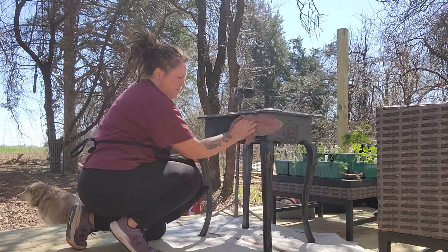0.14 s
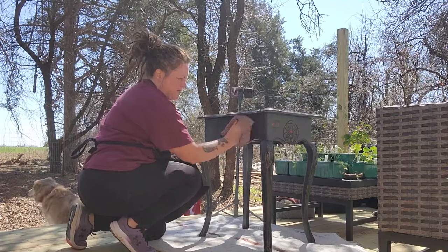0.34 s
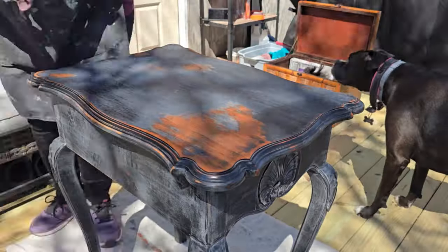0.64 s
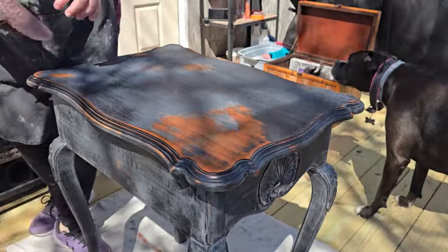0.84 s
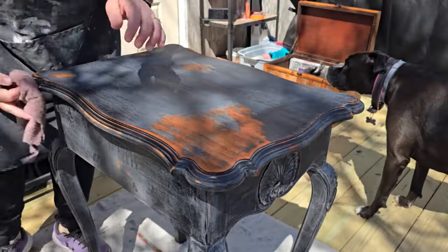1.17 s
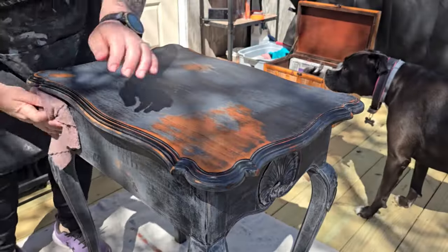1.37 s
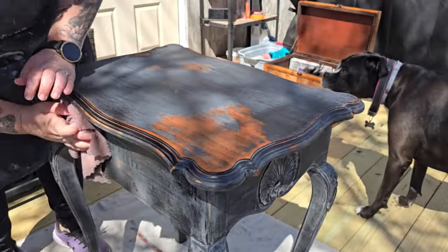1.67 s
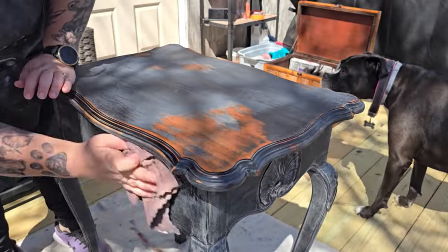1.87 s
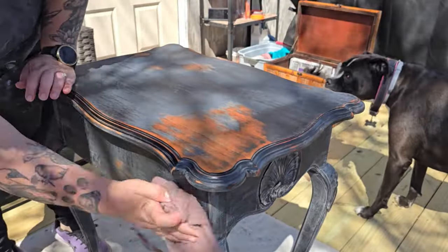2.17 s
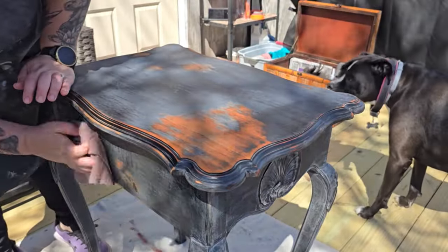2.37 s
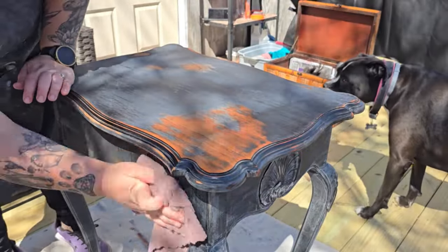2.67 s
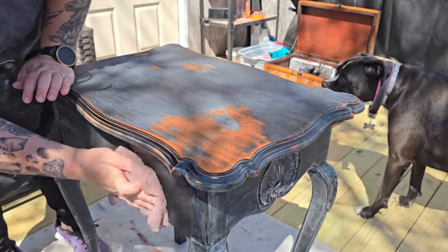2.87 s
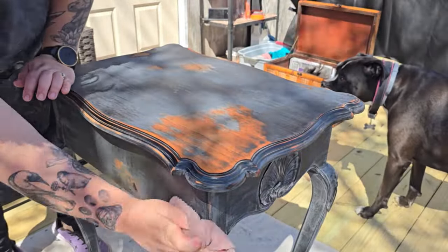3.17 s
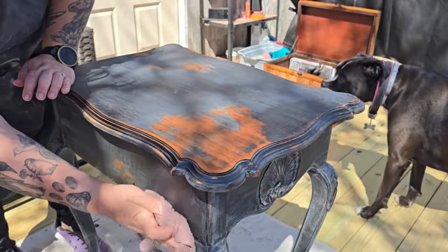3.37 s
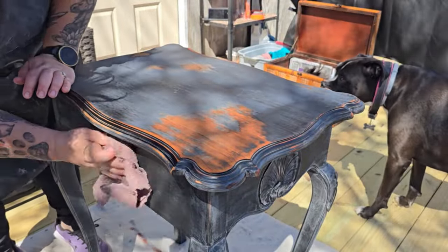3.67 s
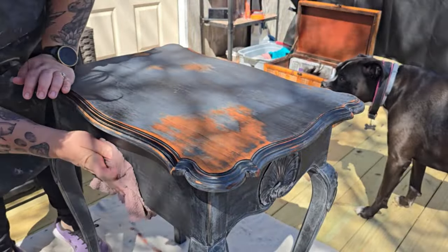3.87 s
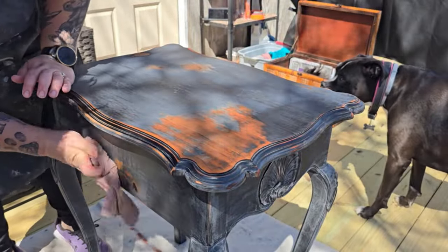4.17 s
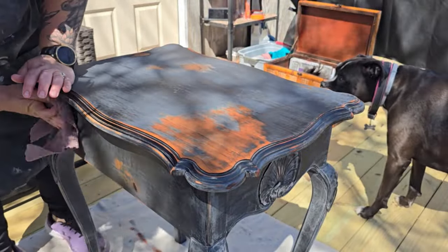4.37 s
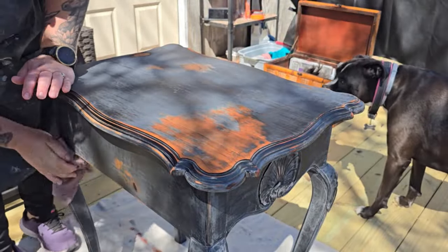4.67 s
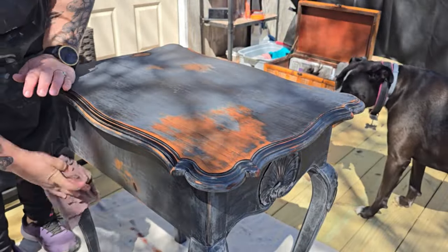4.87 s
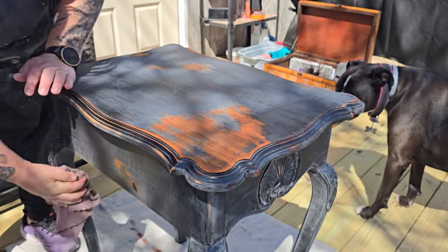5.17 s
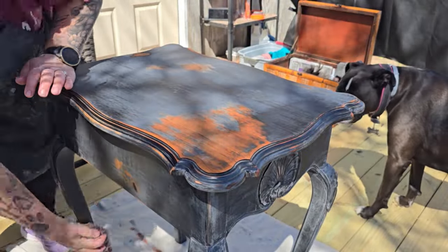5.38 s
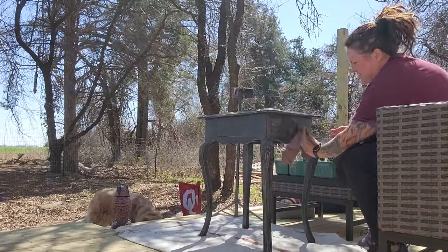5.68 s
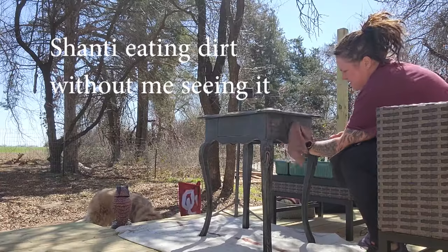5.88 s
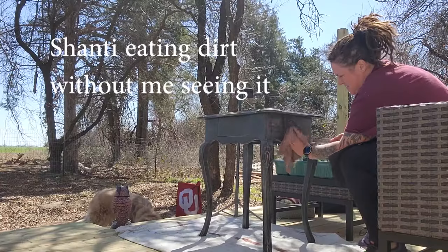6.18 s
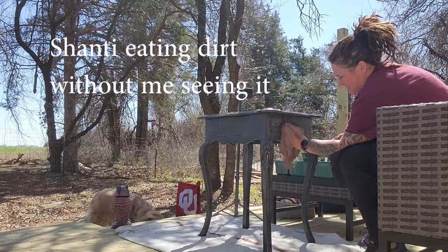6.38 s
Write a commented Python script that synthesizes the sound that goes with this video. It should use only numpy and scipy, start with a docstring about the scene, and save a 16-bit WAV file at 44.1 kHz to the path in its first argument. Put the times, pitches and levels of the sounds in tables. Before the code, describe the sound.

Knuckle taps on hollow wood, then a soft cloth rubbing in faint uneven strokes while wind buffets the microphone on a porch.

```python
"""A damp cloth wipes a small wooden table on a porch, heard by a phone from three places in turn.
A breeze made of random pulses and a murmur of filtered noise run throughout. Knuckles first tap the
wood, ringing its modes; from 0.7 s the cloth hisses stroke by stroke in tiny clicks, with a few more taps.
From 1 s to 5 s hard buffets of wind strike the two microphone ports, worst around 2.5 s.
Faint gliding tones whistle now and then from 1.1 s, most often near the end."""
import sys
import numpy as np
from scipy import signal
from scipy.fft import rfft, irfft, next_fast_len
from scipy.io import wavfile
from scipy.ndimage import uniform_filter1d

SR = 44100
rng = np.random.default_rng(int(sys.argv[2]) if len(sys.argv) > 2 else 0)


def waveform_to_disk(signal):
    """Save audio, clipped to [-1, 1], as 16-bit WAV at the path in sys.argv[1]."""
    frames = np.transpose(np.atleast_2d(signal))
    scaled = np.clip(frames, -1, 1) * 32767
    samples = np.round(scaled).astype(np.int16)
    wavfile.write(sys.argv[1], SR, samples)


N = 287532
T = np.arange(N) / SR
EARS = np.array([[1], [-1]])  # left, right


def undb(db):
    """Turn decibels into a plain gain."""
    return 10 ** (np.asarray(db) / 20)


def unit(x):
    """Scale a sound to rms 1."""
    return x / np.sqrt(np.mean(x ** 2))


def colour(x, spectrum):
    """Filter to the given (f/Hz, level/dB) shape without sounding early (via the cepstrum); rms 1."""
    hz, db = np.transpose(spectrum)
    size = next_fast_len(N + SR // 4)
    f = np.maximum(np.fft.rfftfreq(8192, 1 / SR), 1)
    ceps = irfft(np.interp(np.log(f), np.log(hz), db) * np.log(10) / 20)
    # folding the second half onto the first makes the filter causal
    ceps[1:4096] *= 2
    ceps[4097:] = 0
    response = irfft(np.exp(rfft(ceps)))
    return unit(irfft(rfft(x, size) * rfft(response, size), size)[..., :N])


def walk(rate):
    """Random levels held 1 / rate s and smoothed twice; spread near 1."""
    k = int(SR / rate)
    steps = np.repeat(rng.standard_normal(N // k + 1), k)
    return 1.3 * uniform_filter1d(uniform_filter1d(steps, k), k)[:N]


def grains(rate, scatter_db):
    """Random clicks of either sign and varying size, unrelated in the two ears."""
    on = rng.random((2, N)) < rate / SR
    return on * rng.standard_normal((2, N)) * undb(scatter_db * rng.exponential(size=(2, N)))


def columns(table):
    """Join each column's points by straight lines over time."""
    s, *cols = np.transpose(table)
    return [np.interp(T, s, c) for c in cols]


def apart(db, pan_db):
    """Gains of two unrelated ears whose mean has the level db."""
    return 2 * undb(db + EARS * pan_db / 2) / np.sqrt(undb(pan_db) + undb(-pan_db))


def swells(rows, attack_s, release_s, sag_db):
    """Level in dB of each event: quick rise, climb to its strongest, sag, release; short edges if short."""
    faint_db, silent_db = -25, -80
    levels_db = [silent_db, faint_db, -sag_db, 0, -sag_db, faint_db, silent_db]
    out = []
    for s, n, top, *_ in rows:
        rise, fall = min(attack_s, 0.71 * n), min(release_s, 1.8 * n)
        peak_s, end_s = s + n * np.clip(top, .02, .98), s + n
        times = [s - 2 * rise, s - rise, s, peak_s, end_s, end_s + fall, end_s + 2 * fall]
        out.append(np.interp(T, times, levels_db))
    return out


def blend(shapes_db, db, pan_db):
    """Ear gains of overlapping events, added as power."""
    return np.sqrt(sum(apart(e + d, p) ** 2 for e, d, p in zip(shapes_db, db, pan_db)))


# tone of the wind's low rumble and higher flutter: f/Hz, relative level/dB
RUMBLE_TONE = [(8.8, -48.5), (15, -15), (38, 6.5), (54, 6.5), (87, 1), (119, -10.5), (160, -33.5),
               (210, -54.5), (350, -120)]
FLUTTER_TONE = [(60, -41), (110, 5), (140, 0.5), (200, -6.5), (300, -24), (500, -39.5), (900, -55),
                (2000, -85.5)]
# breeze between gusts: t/s, rumble level/dB, flutter above rumble/dB, left minus right/dB
BREEZE_LEVELS = [(0, -66, -17, -5.5), (.65, -70.5, -16, 2.5), (1.3, -59, -24, 10), (1.5, -74, -50, 8),
                 (1.8, -70, -8, -12), (2.04, -64, -26, -2), (2.25, -62, -9.5, 13), (2.6, -62, -19, 5),
                 (2.84, -53.5, -3.5, 24), (3.06, -63, -20, 2), (3.25, -58.5, -3.5, -14),
                 (3.6, -53.5, -18, 13), (4.1, -61.5, -30, 8.5), (4.7, -58, -20, 21), (5.1, -57, -15.5, -7),
                 (5.45, -63.5, -38, 14), (5.8, -57.5, 1.5, 9), (6.1, -66.5, -7.5, -3), (6.52, -62, 1, -4)]
# gusts: start t/s, length/s, strongest at share of length, rumble level/dB, flutter above rumble/dB,
# left minus right/dB
GUST_EVENTS = [(0.265, 0.077, 0.49, -58, -23, -2), (0.708, 0.077, 0.83, -47, -15, -3),
               (0.797, 0.18, 0.15, -61.5, 3, -2), (0.966, 0.12, 0.092, -39, -4.5, 14),
               (1.109, 0.12, 0.19, -43, -15, 2.5), (1.294, 0.17, 0.46, -55.5, -7, 14),
               (1.604, 0.073, 0.17, -57, -30, 25), (1.866, 0.046, 0.44, -52.5, -2, -29),
               (1.939, 0.053, 0.49, -50.5, -45, 23), (2.109, 0.09, 0.8, -51.5, -14, 29),
               (2.332, 0.11, 0.25, -34.5, -2, 12), (2.44, 0.091, 0.16, -25, -4.5, 16),
               (2.565, 0.14, 0.1, -38, -12, 9.5), (2.702, 0.06, 0.32, -37, 4, 22),
               (2.875, 0.086, 0.7, -37, -32, 22), (2.932, 0.099, 0.35, -38, -13, -4),
               (3.094, 0.11, 0.2, -35.5, -16, 13), (3.262, 0.06, 0.61, -35.5, -0.5, 2.5),
               (3.355, 0.095, 0.94, -39.5, -27, 0), (3.477, 0.13, 0.065, -41.5, -11.5, 12),
               (3.616, 0.14, 0.8, -42, -8, 0.5), (3.771, 0.094, 0.43, -37, 0, 11),
               (3.86, 0.059, 0.58, -37.5, -20.5, -2), (3.964, 0.12, 0.13, -50.5, -9, 14),
               (4.178, 0.091, 0.88, -56.5, -3.5, 29), (4.332, 0.052, 0.5, -48, 0.5, 12),
               (4.432, 0.18, 0.17, -45, -14, 15), (4.673, 0.36, 0.21, -57, -2, 14),
               (4.889, 0.11, 0.93, -42, -15, 7.5), (5.137, 0.11, 0.31, -51, -14, -28),
               (5.46, 0.036, 0.32, -54, -29, 17), (5.583, 0.057, 0.37, -58.5, -2.5, -6),
               (5.738, 0.058, 0.54, -47.5, -7, 14), (5.901, 0.039, 0.45, -42.5, -6, 25),
               (6.131, 0.15, 0.27, -57, 3, 2), (6.312, 0.17, 0.41, -55.5, -1.5, 2)]
# hardest buffets: middle t/s, level/dB in the louder ear before the pointed crest, left minus right/dB
BUFFET_EVENTS = [(1.018, -30.5, 10), (1.165, -34.5, -20), (1.905, -39, -16), (2.351, -24, 13),
                 (2.378, -24.5, 10), (2.467, -16, 12), (2.5, -21, 20), (2.523, -20.5, 19), (2.716, -28, -1),
                 (2.741, -25.5, 13), (2.776, -23.5, 16), (2.94, -29, -12), (2.98, -39, -12),
                 (3.142, -30, 5), (3.29, -23.5, 19), (3.422, -30, 3), (3.49, -26.5, 11), (3.616, -34.5, 19),
                 (3.719, -28, -26), (3.8, -31, 2), (3.828, -31, 24), (4.121, -36.5, 15), (4.363, -43.5, 18),
                 (4.458, -36, 16), (4.532, -38.5, 11), (4.943, -29.5, 7)]


def wind():
    """Eddies push each port in soft random pulses; their flutter peaks more sharply than their rumble."""
    db, flutter_db, pan_db = np.transpose(GUST_EVENTS)[3:]
    attack_s, release_s = 0.016, 0.027
    rumble_shapes = swells(GUST_EVENTS, attack_s, release_s, 9.5)
    flutter_shapes = swells(GUST_EVENTS, attack_s, release_s, 13)
    calm_db, calm_flutter_db, calm_pan_db = columns(BREEZE_LEVELS)
    calm_rumble = apart(calm_db, calm_pan_db)
    calm_flutter = apart(calm_db + calm_flutter_db, calm_pan_db)
    rumble = np.hypot(calm_rumble, blend(rumble_shapes, db, pan_db))
    flutter = np.hypot(calm_flutter, blend(flutter_shapes, db + flutter_db, pan_db))
    eddies = grains(180, 0.77)
    gusts = rumble * colour(eddies, RUMBLE_TONE) + flutter * colour(eddies, FLUTTER_TONE)

    half = 1500  # samples either side of a buffet
    t = np.arange(-half, half) / SR
    hush = 1 - .5 * np.hanning(len(t))  # the small eddies give way around a hard buffet
    width_s = 0.0037
    # a hard buffet is one swing of pressure with a dip either side
    swing = (1 - (t / width_s) ** 2) * np.exp(-.5 * (t / width_s) ** 2)
    swing += undb(-19.5) / (1 + (t / 0.00089) ** 2)  # its crest is pointed
    for s, peak_db, lr_db in BUFFET_EVENTS:
        i = int(s * SR)
        ear_gain = undb(np.array([[min(lr_db, 0)], [min(-lr_db, 0)]]))
        push = rng.choice([-1, 1], (2, 1))  # inward or outward at each port
        gusts[:, i - half:i + half] *= hush
        gusts[:, i - half:i + half] += push * undb(peak_db) * ear_gain * swing
    return gusts


# tone of the fine hiss, its airy top and the coarse scrape: f/Hz, relative level/dB
HISS_TONE = [(3530, -9), (6000, -3.5), (6880, -3.5), (8820, -7), (10300, -5), (11000, -5.5), (14300, -36),
             (22000, -120)]
AIRY_TONE = [(6470, -36), (11000, -10), (14300, -3.5), (15100, -4.5), (15700, -12)]
SCRAPE_TONE = [(530, -20.5), (900, -11), (1080, -21.5), (1290, -2), (1670, -3.5), (2220, 1), (2720, -3),
               (3460, -1.5), (7000, -12), (9100, -22), (15400, -120)]
# brighter band sliding as the cloth folds and turns: t/s, centre f/Hz, mean level above hiss/dB
BRIGHT_BAND = [(0, 8500, -9), (1.0, 8500, -16), (1.9, 8800, -5), (2.35, 8800, -3.5), (2.55, 9500, -6.5),
               (2.9, 8800, -8), (3.2, 9400, -3), (3.33, 8700, 1), (3.43, 7600, 0), (3.52, 8600, -4),
               (3.65, 9000, -16), (3.8, 9400, -3), (3.92, 9500, -6), (4.1, 8700, -3), (4.23, 9500, -3),
               (4.55, 9000, -7), (4.9, 9000, -7), (6.52, 9000, -12)]
# strokes, and at 0.753 the brief bright crack of a tap: start t/s, length/s,
# hardest at share of length, hiss level/dB before its patchiness,
# scrape above hiss/dB, airy top above hiss/dB, left minus right/dB before the ears share sound
STROKE_EVENTS = [(0.712, 0.021, 0.3, -92, 1, 2, -7), (0.753, 0.0099, 0.46, -78.5, -3, 1, -20),
                 (0.8, 0.08, 0.7, -87.5, 3, -8, -1), (0.963, 0.17, 0.16, -84, 3, -1.5, 2),
                 (1.19, 0.26, 0.44, -89, 7, -5, 2), (1.497, 0.14, 0.27, -86, 1, -5, 3),
                 (1.67, 0.11, 0.33, -89.5, 8, -2, 0), (1.819, 0.15, 0.46, -79, -0.5, -0.5, 5.5),
                 (1.943, 0.2, 0.081, -84, 1.5, 2.5, 2.5), (2.218, 0.21, 0.68, -79.5, -2.5, 0.5, 3.5),
                 (2.482, 0.27, 0.38, -80, -2.5, -1.5, 3.5), (2.758, 0.44, 0.21, -82, -7, -2, 3.5),
                 (3.114, 0.12, 0.81, -82.5, -2.5, 2.5, 1), (3.262, 0.097, 0.68, -80, -3.5, 1.5, 3),
                 (3.415, 0.1, 0.089, -79, -18, -1, 4), (3.515, 0.068, 0.18, -82, -10.5, 2, 4),
                 (3.594, 0.061, 0.73, -87.5, 2.5, 5, 4), (3.685, 0.19, 0.64, -81, -3, 1, 5.5),
                 (3.908, 0.03, 0.15, -73, -16, -2, 6), (3.968, 0.2, 0.79, -84.5, 0.5, 3.5, 5),
                 (4.2, 0.058, 0.57, -75, -12, 0.5, 7), (4.33, 0.13, 0.94, -85, 5.5, 2.5, 5.5),
                 (4.488, 0.18, 0.59, -80, -2, 1, 7.5), (4.657, 0.17, 0.34, -85.5, 3, 3.5, 5.5),
                 (4.91, 0.052, 0.44, -90.5, -4, 3, 8), (5.02, 0.065, 1, -95.5, 15.5, -18, 8),
                 (5.135, 0.17, 0.82, -93, 5.5, -5, 4), (5.347, 0.38, 0.3, -85, 4, -16, 1),
                 (5.737, 0.11, 0.066, -90.5, 10, -18, 4), (5.872, 0.15, 0.11, -83.5, 6.5, -5, 1.5),
                 (6.09, 0.13, 0.53, -89.5, 6.5, -15, 3), (6.247, 0.16, 0.26, -93, 9, -10, 2),
                 (6.37, 0.16, 0.19, -90, 6, -6, 2)]


def cloth():
    """Fibres slip in dense tiny clicks: patchy hiss with a sliding bright band, airy top and scrape."""
    db, scrape_db, top_db, pan_db = np.transpose(STROKE_EVENTS)[3:]
    press = swells(STROKE_EVENTS, attack_s=0.1, release_s=0.059, sag_db=2)
    hiss = colour(grains(9000, 0.43), HISS_TONE) * undb(2.8 * walk(24.77))

    centre_hz, sheen_db = columns(BRIGHT_BAND)
    width_hz = 1900
    slow = signal.butter(2, width_hz / 2, fs=SR, output="sos")
    turn = 2 * np.pi * np.cumsum(centre_hz) / SR
    # slow noise on a sine and a cosine makes a noise band around the centre
    sheen = sum(signal.sosfilt(slow, rng.standard_normal((2, N))) * f(turn) for f in (np.sin, np.cos))
    sheen = unit(sheen)
    hiss = hiss + undb(sheen_db + 1.4 * walk(15)) * sheen

    top = colour(grains(12000, 0.38), AIRY_TONE) * undb(0.4 * walk(38))
    scrape = colour(grains(4000, 0.87), SCRAPE_TONE) * undb(2.2 * walk(30))
    rub = blend(press, db, pan_db) * hiss
    rub += blend(press, db + top_db, pan_db) * top
    rub += blend(press, db + scrape_db, pan_db) * scrape
    return rub + 0.13 * rub[::-1]  # a share of each ear's sound reaches the other


# ringing modes of the table: f/Hz, level/dB before each tap's changes,
# time to fade by 60 dB/s before the tap's ring factor
TABLE_MODES = [(178, 4, 0.076), (239, -7, 0.13), (302, 1, 0.069), (455, -0.5, 0.1), (556, -18, 0.059),
               (720, 2, 0.096), (794, -4, 0.091), (880, -13.5, 0.12), (919, -5.5, 0.068),
               (1048, -8.5, 0.061), (1260, -5, 0.074), (1440, -4.5, 0.026), (1564, -7, 0.064),
               (1896, -12.5, 0.092), (2060, -20, 0.037), (2295, -15.5, 0.16), (3020, -12, 0.05),
               (3300, -18, 0.15), (3680, -16, 0.11), (4650, -13, 0.075)]
# taps, and at 5.742 a light broad tick as the place changes: t/s, overall level/dB,
# left minus right/dB, contact/ms, crack level/dB relative to overall,
# ring factor on the fade time, boost of modes under 350 Hz/dB, favoured f/Hz
TAP_EVENTS = [(0.399, -39.5, -3, 0.49, -30, 0.47, -6, 1020), (0.4045, -30, 4, 0.87, -30.5, 0.63, -17, 1460),
              (.4063, -31, -2, 0.81, -44, 1.22, -5, 843), (0.4136, -32, 1.5, 0.6, -40, 0.89, 5, 455),
              (.421, -33.5, -2, 0.47, -35, 0.53, -23, 810), (.754, -56, 1, .3, -16, 0.65, 7, 850),
              (1.617, -48.5, 3, 0.73, -40, 0.3, -16, 996), (2.828, -66, 5, 1.3, -30, 0.33, 9, 405),
              (4.006, -63, 0, 1.3, -22, 1.3, 1, 690), (4.27, -64, -3, .7, -12, 0.53, -7, 720),
              (4.283, -64, 12, 0.62, -23, 0.9, 7.5, 239), (4.288, -56, -4, 0.53, -34, 0.81, -6, 1260),
              (4.293, -52, -5, 0.65, -32, 0.67, -10, 770), (4.311, -58, 2, 0.5, -35, 0.4, 4.5, 1260),
              (4.316, -59, -2, 0.83, -30, 0.52, -9, 760), (4.353, -64, 3, 0.25, -10.5, 1.2, -17, 880),
              (5.027, -68.5, -2, 0.66, -14, 1.6, -18, 560), (5.073, -59, 3, 0.37, -7.5, 0.34, 5.5, 3300),
              (5.217, -52, 4, .8, -30, 0.24, -7, 720), (5.221, -59.5, 1, 1.2, -37, 1.2, -0.5, 302),
              (5.742, -46.5, 10, .4, -22, 0.16, 2, 520)]


def taps():
    """Each blow rattles on the wood and rings its modes, duller with longer contact, under a dry crack."""
    out = np.zeros((2, N + SR // 2))
    t = np.arange(SR // 4) / SR
    hz, mode_db, t60 = (c[:, None] for c in np.transpose(TABLE_MODES))
    crack_band = signal.butter(3, [1200, 4600], "band", fs=SR, output="sos")
    for s, db, pan_db, contact_ms, crack_db, ring, thud_db, spot_hz in TAP_EVENTS:
        ring = np.clip(ring, .05, 1.5)
        # every spot stirs the modes a little differently, and each ear hears them from another side
        spot, side = rng.standard_normal((2, len(TABLE_MODES), 1))
        near_db = 11 * np.exp(-(np.log2(hz / spot_hz) / 0.22) ** 2)  # modes that move most under the knuckle
        gain = undb(mode_db + near_db + spot + thud_db * (hz < 350))
        gain = gain / (1 + (hz * contact_ms / 1500) ** 2)  # long contact dulls
        fade = (1 - np.exp(-t / 0.00095)) * np.exp(-np.log(1000) * t / (t60 * ring))
        turn = EARS[:, :, None] * side * np.minimum(hz / 600, 1.3) * 0.59
        body = np.sum(gain * fade * np.sin(2 * np.pi * hz * t + turn), axis=1)
        rattle = .018 * np.exp(-t / (.008 * ring)) * rng.standard_normal((2, len(t)))
        rattle = (t == 0) + rattle  # the first blow, then the rattle
        body = signal.fftconvolve(body, rattle, axes=1)[:, :len(t)]
        body = body / np.linalg.norm(gain[hz > 350])
        crack = signal.sosfilt(crack_band, rng.standard_normal((2, len(t))))
        crack = crack / np.std(crack)
        crack *= (1 - np.exp(-t / 0.001)) * np.exp(-t / (0.038 * ring))
        i = int(s * SR)
        out[:, i:i + len(t)] += undb(db + EARS * pan_db / 2) * (body + undb(crack_db) * crack)
    return out[:, :N]


# faint far whistles, perhaps birds: start t/s, length/s, from f/Hz, to f/Hz (both before the waver),
# level/dB before the blur
WHISTLE_EVENTS = [(1.105, 0.034, 4020, 4130, -77), (1.123, 0.07, 4220, 4270, -77),
                  (1.19, .08, 4200, 4250, -88), (1.232, 0.053, 1560, 1360, -70),
                  (1.28, 0.027, 1192, 1090, -69), (2.226, 0.18, 2400, 2440, -78.5),
                  (3.1, 0.059, 3480, 3300, -80), (3.145, .075, 3200, 2500, -82),
                  (3.203, 0.072, 2320, 2210, -73), (5.835, .04, 4100, 4100, -75),
                  (5.885, .03, 4880, 4970, -79), (5.93, 0.039, 4940, 4960, -82),
                  (5.965, .03, 4980, 5000, -80), (5.987, 0.04, 4050, 4020, -83),
                  (6.0, .03, 5000, 5000, -83), (6.19, 0.037, 5250, 5250, -83),
                  (6.257, 0.03, 4900, 4920, -80)]


def whistles():
    """Short gliding tones that waver in pitch, blurred by the air on the way."""
    out = np.zeros(N)
    waver = 1 + 0.015 * walk(300)
    for s, length, from_hz, to_hz, db in WHISTLE_EVENTS:
        share = np.clip((T - s) / length, 0, 1)
        hz = (from_hz + (to_hz - from_hz) * share) * waver
        out += undb(db) * np.sin(np.pi * share) * np.sin(2 * np.pi * np.cumsum(hz) / SR)
    blur = .6 + .5 * np.array([walk(200), walk(200)])
    return out * blur


# edges of the phone's stays in each place: t/s
PLACE_TIMES = [0, .7065, 5.742, 7]
# the yard from each place: level/dB above 300 Hz before the swell, left minus right/dB,
# samples by which the left port hears it first (rounded when played)
PLACE_LEVELS = [(-70.5, -0.5, 1), (-71, 2.5, 9.4), (-73.5, -3, 2)]
# tone of the yard, one list for each place: f/Hz, relative level/dB
YARD_TONES = [
    [(71, -28), (120, 3), (255, -9), (417, -16), (480, -14.5), (521, -20.5), (1160, -17.5), (1850, -32.5),
     (2170, -16.5), (2560, -33), (3340, -29.5), (3930, -32.5), (5230, -31), (7390, -40.5), (15700, -48)],
    [(88, -34.5), (150, -8), (346, -7), (446, -8), (953, -15), (1180, -12.5), (2670, -24.5), (4100, -20.5),
     (5710, -28.5), (7350, -23.5), (13200, -27.5), (14800, -35), (15700, -48)],
    [(71, -23), (120, -7), (408, -15.5), (480, -16.5), (532, -23.5), (601, -17.5), (768, -19.5),
     (1110, -19.5), (1300, -27.5), (1610, -27.5), (1850, -29), (2080, -18.5), (2330, -33.5), (2550, -44.5),
     (3700, -45.5), (4100, -33), (4600, -42), (4980, -31.5), (5500, -33), (8190, -58), (10900, -52.5),
     (15700, -70)],
]
# the murmur swells and dips: t/s, change of level/dB
YARD_SWELL = [(0, -3.5), (.7, -2.5), (1.2, -4.5), (1.7, -3.5), (2.2, -7), (2.7, -5), (3.1, -10),
              (3.5, -9.5), (3.9, -7), (4.3, -6), (4.75, -3.5), (4.87, -8), (5.0, -9), (5.1, -6.5),
              (5.45, 1), (5.74, 0), (5.78, 3), (6.1, 5), (6.52, 1.5)]


def yard():
    """A far murmur, alike in both ears in the bass, each band flickering alone; it jumps with the place."""
    out = np.zeros((2, N))
    no_bass = signal.butter(4, 300, "high", fs=SR, output="sos")
    stays = zip(PLACE_TIMES, PLACE_TIMES[1:], PLACE_LEVELS, YARD_TONES)
    for start, end, (db, pan_db, lead), spectrum in stays:
        mid, side = rng.standard_normal((2, N))
        side = signal.lfilter([1, -.97], [1.2, -1.0], side)  # weak in the bass
        both = np.array([mid, np.roll(mid, round(lead))])
        murmur = colour(both + EARS * side, spectrum)
        loudness = np.std(signal.sosfilt(no_bass, murmur))
        out += ((T >= start) & (T < end)) * murmur * undb(db + EARS * pan_db / 2) / loudness

    edges_hz = 60 * 2 ** np.arange(0, 8.2, .3)
    size = next_fast_len(N)
    band = np.searchsorted(edges_hz, np.fft.rfftfreq(size, 1 / SR))
    steady = rfft(out, size)
    swell_db, = columns(YARD_SWELL)
    flickering = np.zeros((2, N))
    for k in range(len(edges_hz) + 1):
        one_band = irfft(steady * (band == k), size)[:, :N]
        flickering += one_band * undb(swell_db + 2.95 * walk(13))
    return flickering


def scene():
    """Add all the sources, in two ears."""
    return wind() + cloth() + taps() + whistles() + yard()


def record(dry):
    """The phone cuts the top, steeply above 15750 Hz."""
    return signal.sosfilt(signal.ellip(10, .2, 70, 15750, fs=SR, output="sos"), dry)


dry = scene()
out = record(dry)
waveform_to_disk(out)
```